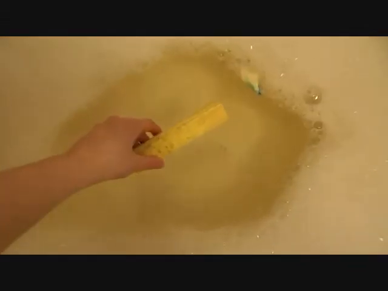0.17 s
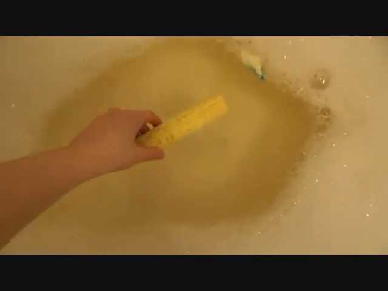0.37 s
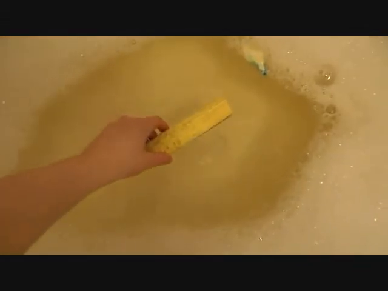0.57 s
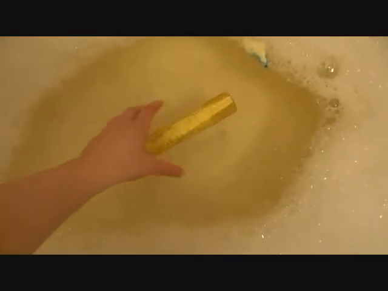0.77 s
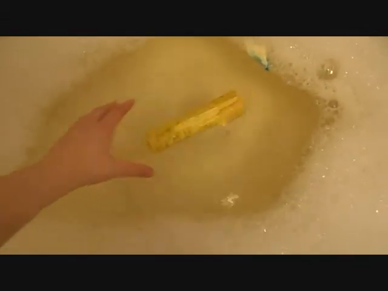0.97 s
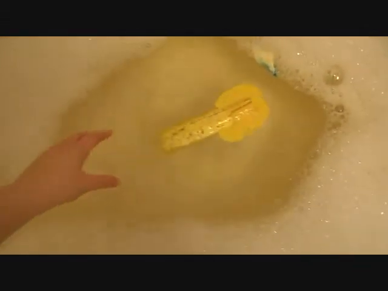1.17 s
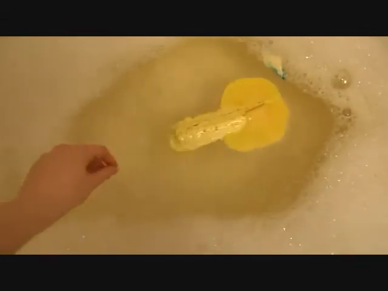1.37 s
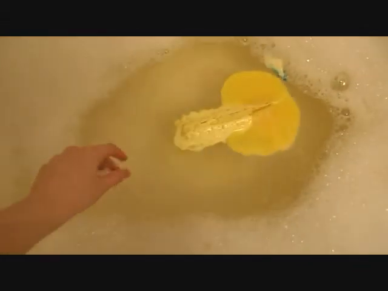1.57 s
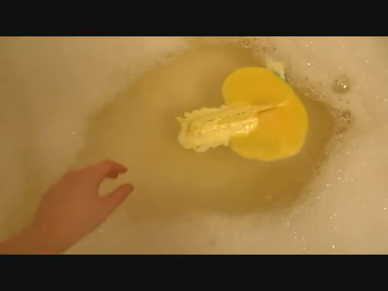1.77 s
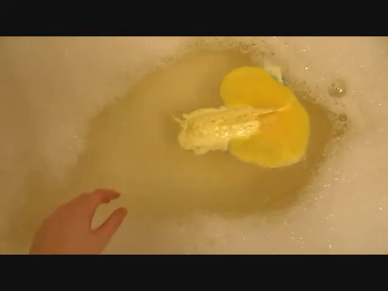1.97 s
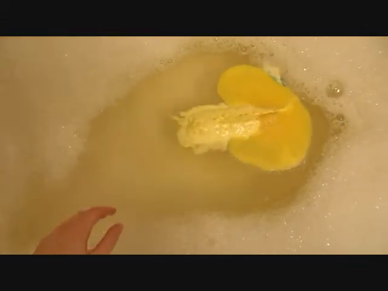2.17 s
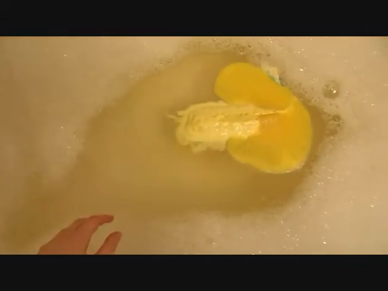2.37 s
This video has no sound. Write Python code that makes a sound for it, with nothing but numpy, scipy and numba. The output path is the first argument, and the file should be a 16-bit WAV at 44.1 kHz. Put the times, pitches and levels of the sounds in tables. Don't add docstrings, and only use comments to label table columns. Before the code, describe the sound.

A bath bomb fizzing in a bathtub, heard close in stereo. Over faint microphone hiss, low water laps softly until about 0.7 s. Drips plink at 0.75-0.85 s, then trapped air spits in tiny crackles around 0.95-1.1 s. From 1.2 s a bright fizz swells, with small gurgles and a plink near 1.3 s, reaching full level by 1.8 s and holding steady to the end.

```python
import sys
import numpy as np
from scipy import signal
from scipy.fft import rfft, irfft
from scipy.io import wavfile
from scipy.ndimage import uniform_filter1d
from numba import njit

SR = 44100
rng = np.random.default_rng(int(sys.argv[2]) if len(sys.argv) > 2 else 0)


def boost(x):
    u = np.asarray(x, float) / 20
    return 10 ** u


def master_out(mix):
    frames = np.transpose(np.atleast_2d(mix))
    ceiling = np.clip(frames, -1, 1)
    pcm = np.round(ceiling * 32767).astype(np.int16)
    wavfile.write(sys.argv[1], SR, pcm)


N = 105928


def unit(x):
    return x / np.sqrt(np.mean(x ** 2))


def colour_db(table, hz):
    table = np.array(table, float)
    return np.interp(np.log(hz), np.log(table[:, 0] + 1), table[:, 1])


def walk(rate):
    hold = int(SR / rate)
    steps = np.repeat(rng.standard_normal(200), hold)[:N + hold]
    path = uniform_filter1d(uniform_filter1d(steps, hold), hold)[:N]
    return unit(path - path.mean())


@njit
def ring(out, start, hz, cycles, size, rise):
    y = np.zeros(len(out))
    for g in range(len(start)):
        first = int(start[g]) + 1
        life = cycles[g] / hz[g] * SR
        age = first - start[g]
        phasor = size[g] * np.exp((2j * np.pi * hz[g] / SR - 5 / life) * age)
        turn = np.exp(2j * np.pi * hz[g] / SR - 5 / life)
        bend = np.exp(2j * np.pi * hz[g] / SR * rise[g] / life)
        for j in range(max(first, 0), min(first + int(life) + 1, len(y))):
            y[j] += phasor.imag
            phasor *= turn
            turn *= bend
    return y


def bubbles(s, hz, cycles, size, rise):
    one = np.ones(len(s))
    return ring(np.zeros(N), s * SR, np.minimum(hz, 19000) * one, cycles * one, size * one, rise * one)


def swarm(count=70000):
    cycles, scatter_db, glide = 5, 1.3, .1
    when, pitch, luck = rng.random((count, 3)).T
    hz = 1000 * 2 ** (4.2 * pitch)
    size = hz * boost(-scatter_db * np.log(luck + 1e-4))
    spectrum = rfft(bubbles(when * N / SR, hz, cycles, size, glide))
    return spectrum / np.sqrt(uniform_filter1d(np.abs(spectrum) ** 2, size=2001))


def fizz():
    # (time [s], level [dB])
    fizz_growth = [(1.0, -59.5), (1.07, -63), (1.236, -47), (1.36, -43.8), (1.49, -41), (1.79, -39),
                   (2.0, -39), (2.318, -39.5), (2.4, -40)]
    # (frequency [Hz], level per Hz [dB])
    foam_colour = [(1100, -28), (2200, -21), (3500, -16), (5000, -11), (7000, -6), (10000, -3), (11900, 0),
                   (16000, -7)]
    # (frequency [Hz], left minus right [dB])
    foam_shading = [(2000, 0), (7000, -.4), (9500, 1.2), (12000, .6), (15500, -.2)]
    # (frequency [Hz], share of power [0-1])
    shared_power = [(2500, .34), (6000, .46), (9500, .5), (13000, .34)]
    start_s, trim_db, left_lag_s = .95, .5, 1.1e-5
    seethe_db, seethe_per_s = .35, 11

    hz = np.maximum(np.fft.rfftfreq(N, 1 / SR), 1)
    lag = np.exp(-2j * np.pi * hz * np.array([[left_lag_s], [0]]))
    share = np.clip(colour_db(shared_power, hz), 0, 1)
    common = np.sqrt(share) * swarm() * lag
    separate = np.sqrt(1 - share) * np.array([swarm(), swarm()])
    shading = boost(np.array([[.5], [-.5]]) * colour_db(foam_shading, hz))
    crowd = (common + separate) * shading
    sound = unit(irfft(crowd * boost(colour_db(foam_colour, hz)), N))

    t, rows = np.arange(N) / SR, np.array(fizz_growth)
    level_db = np.interp(t, rows[:, 0], rows[:, 1]) + trim_db + seethe_db * walk(seethe_per_s)
    return sound * boost(level_db) * np.clip((t - start_s) / .05, 0, 1)


def clusters(table, spread_oct, cycles, count):
    s, db, length, hz = np.array(table, float).T[:, :, None]
    when, pitch, luck = np.moveaxis(rng.standard_normal((len(table), count, 3)), 2, 0)
    hz = hz * 2 ** (spread_oct * pitch)
    size = boost(db + 3 * luck) * np.sqrt(length * hz / cycles / count * 40)
    return bubbles((s + length / 2 * when).ravel(), hz.ravel(), cycles, size.ravel(), .2)


def settling():
    # (time [s], level [dB], length [s], pitch [Hz])
    settling_clouds = [
        (1.16, -63.5, 0.082, 4000),
        (1.2, -63, 0.043, 1980),
        (1.3, -59.5, .1, 4230),
        (1.41, -59, .09, 3650),
    ]
    return clusters(settling_clouds, spread_oct=.55, cycles=8, count=500)


def spurts():
    # (time [s], level [dB], length [s], pitch [Hz])
    air_spurts = [(.963, -63, .003, 6200), (.975, -57, .004, 6800), (.994, -55.5, .011, 5300),
                  (1.010, -60, .006, 5200), (1.027, -59, .007, 4800), (1.051, -58.5, .009, 5000),
                  (1.073, -62, .006, 5000), (1.097, -62, .005, 5500), (.59, -68, .02, 11000),
                  (.831, -63, .003, 7500), (.760, -63, .003, 7000), (.981, -62, .003, 5000)]
    return clusters(air_spurts, spread_oct=.25, cycles=8, count=120)


def drips():
    # (time [s], peak [dB], pitch [Hz], half the cycles rung, pitch rise [share])
    finger_drops = [(.7573, -38.5, 2850, 12, .06), (.7605, -42, 2980, 6, .03), (.776, -47.5, 2900, 16, .03),
                    (.8192, -49, 8900, 50, .5), (.8285, -38, 3150, 6, .05), (.8322, -44.5, 3200, 8, .05),
                    (.846, -49, 2900, 10, .03), (1.2905, -40, 3750, 8, .05), (1.2915, -45, 2700, 6, .05),
                    (1.62, -50, 250, 5, .1), (.7580, -43, 4600, 4, .05), (.7568, -46, 1500, 2, .05),
                    (.7865, -52, 3100, 12, .03), (.8295, -48, 5000, 4, .1), (.9755, -47, 5050, 14, .05),
                    (1.0115, -40, 5200, 3, .05), (1.0532, -42, 6000, 3, .05), (1.095, -45, 5000, 4, .05),
                    (1.1105, -42, 7000, 2, .05), (1.128, -44, 6300, 8, .05)]
    s, db, hz, cycles, rise = np.array(finger_drops, float).T
    return bubbles(s, hz, 2 * cycles, boost(db), rise)


def slosh():
    # (time [s], level [dB], length [s], pitch [Hz])
    laps = [(.11, -62, .06, 417), (.19, -63, 0.045, 450), (.28, -65, 0.059, 420), (0.12, -70.5, .12, 1040),
            (.62, -63.5, .02, 258), (.11, -67, .05, 1110), (1.05, -63, 0.038, 640), (1.4, -66.5, .03, 1080),
            (1.32, -67.5, 0.046, 970), (1.205, -60.5, 0.0199, 495), (1.31, -65, 0.065, 444),
            (1.5, -77, .04, 440), (1.63, -69.5, 0.0308, 270), (1.83, -66, 0.036, 400)]
    return clusters(laps, spread_oct=.22, cycles=8, count=40)


def tub(x):
    t60_s, scatter_db, gap_s = .07, -7, .0015
    t = np.arange(SR // 4) / SR
    tail = rng.standard_normal((2, len(t))) * boost(-60 * t / t60_s) * np.clip(t / gap_s - 1, 0, 1)
    tail *= boost(scatter_db) / np.sqrt(np.sum(tail ** 2, axis=1, keepdims=True))
    return x + signal.fftconvolve(x[None], tail, axes=1)[:, :N]


def bumps():
    # (time [s], peak [dB], pitch [Hz], cycles rung)
    casing_bumps = [
        (.752, -79, 45, 3),
        (2.17, -76, 55, 4),
    ]
    s, db, hz, cycles = np.array(casing_bumps, float).T
    return uniform_filter1d(bubbles(s, hz, cycles, boost(db), 0), size=150)


def hiss():
    # (frequency [Hz], level per Hz [dB])
    noise_colour = [(18, -83), (30, -52), (271, -6.5), (381, -6), (677, -8.5), (814, -9.5), (1060, -9.5),
                    (1500, -12), (6500, -19.5), (15700, -21)]
    level_db, flicker_db, flicker_per_s, pan_db = -52.5, .55, 8.78, -0.76
    hz = np.maximum(np.fft.rfftfreq(N, 1 / SR), 1)
    noise = irfft(rfft(rng.standard_normal((2, N))) * boost(colour_db(noise_colour, hz)), N)
    balance = boost(np.array([[pan_db], [-pan_db]]) / 2)
    return unit(noise) * balance * boost(level_db + flicker_db * walk(flicker_per_s))


def scene():
    pan_db, low_cut_hz = -0.84, 186
    drops = drips() + spurts() + slosh() + settling()
    water = (tub(drops) + fizz()) * boost(np.array([[pan_db], [-pan_db]]) / 2)
    cut = signal.butter(4, low_cut_hz, "high", fs=SR, output="sos")
    return signal.sosfilt(cut, water) + hiss() + bumps()


def band_limit(x):
    return signal.sosfilt(signal.butter(12, 17000, fs=SR, output="sos"), x)


def record(dry):
    top_hz = 15760
    hz = np.fft.rfftfreq(N, 1 / SR)
    mix = irfft(rfft(dry) * (hz < top_hz), N)
    return band_limit(mix)


dry = scene()
out = record(dry)
master_out(out)
```